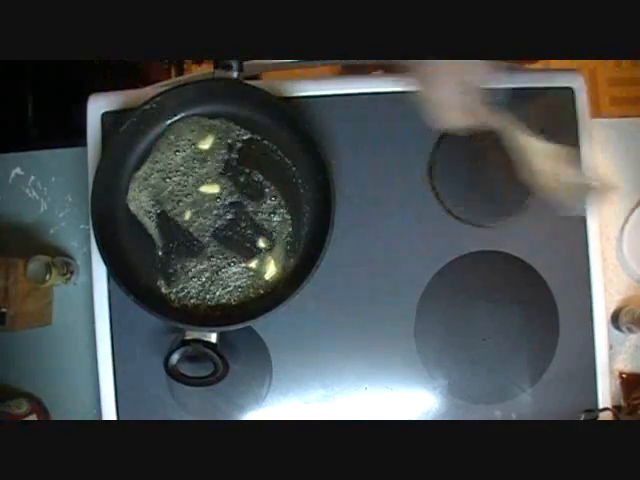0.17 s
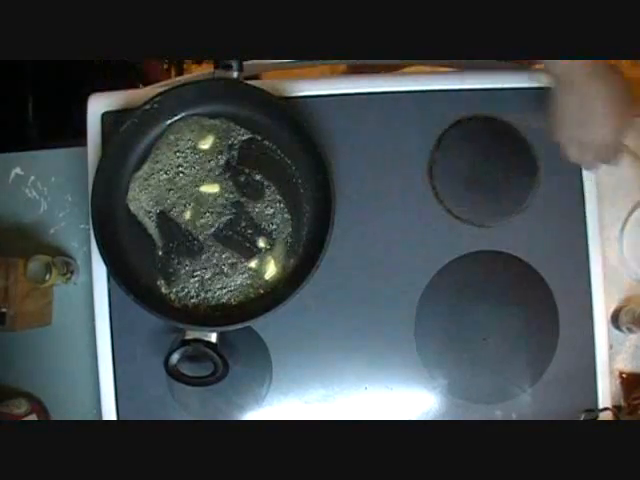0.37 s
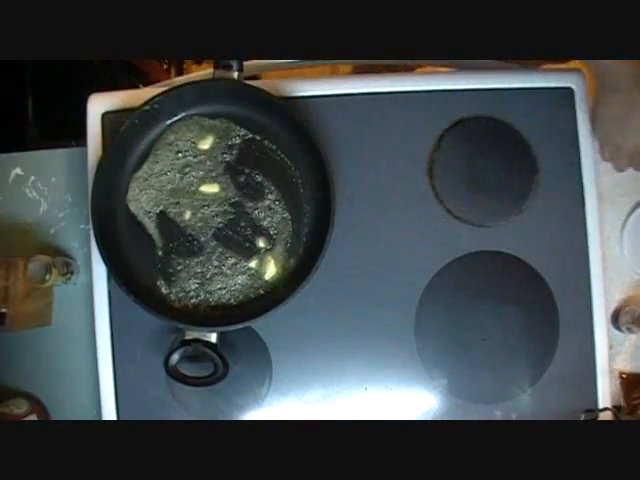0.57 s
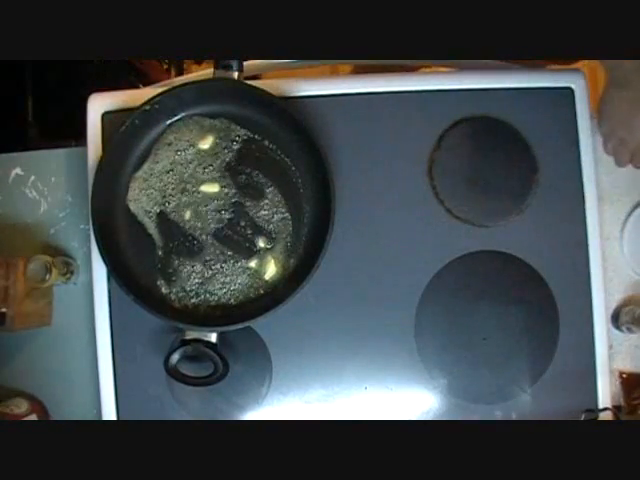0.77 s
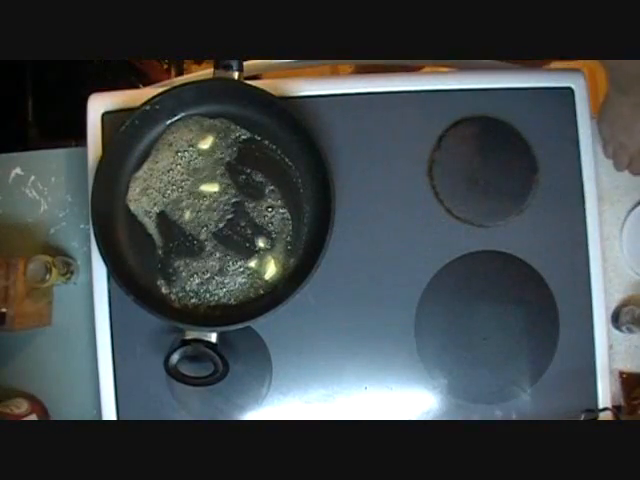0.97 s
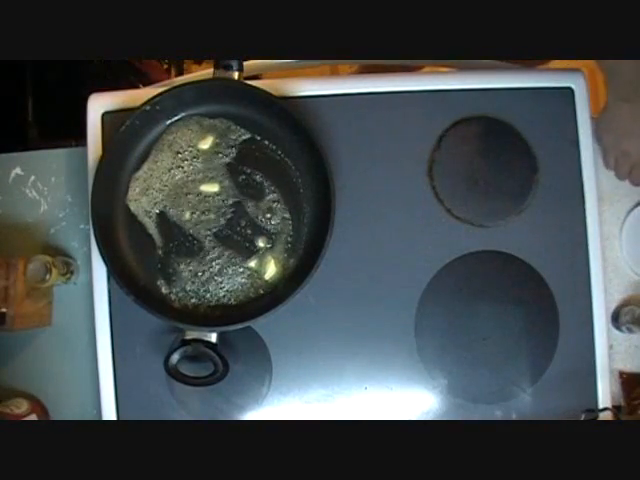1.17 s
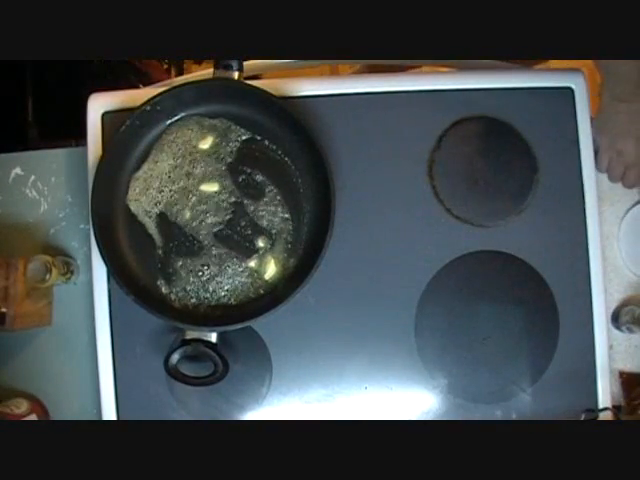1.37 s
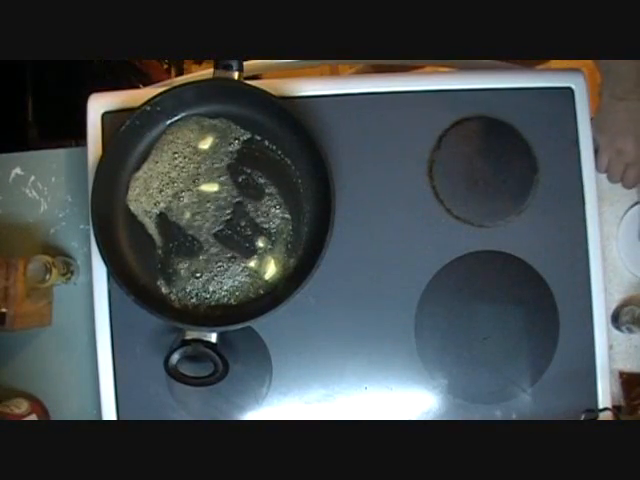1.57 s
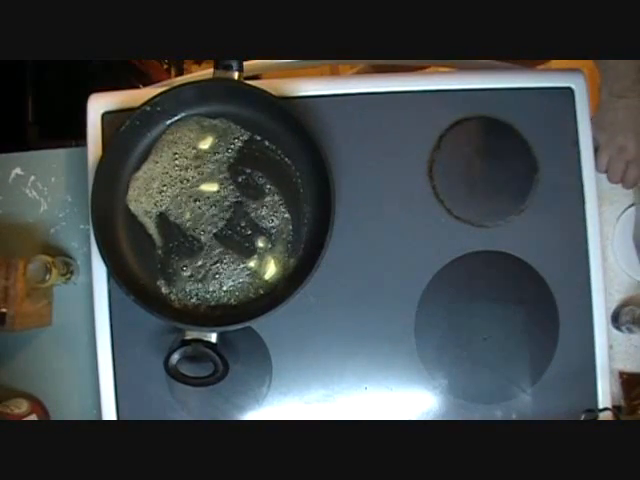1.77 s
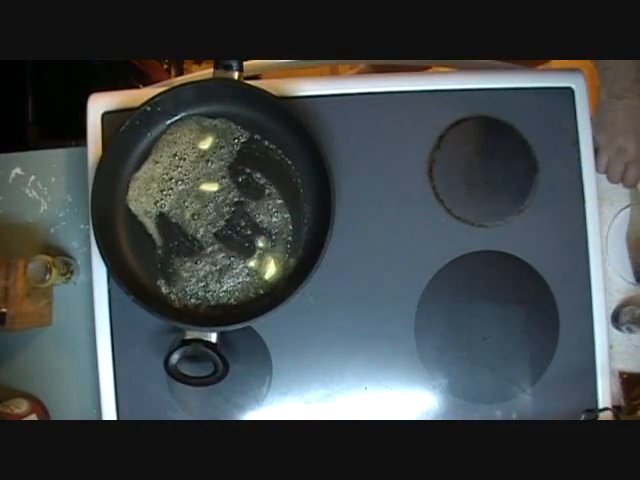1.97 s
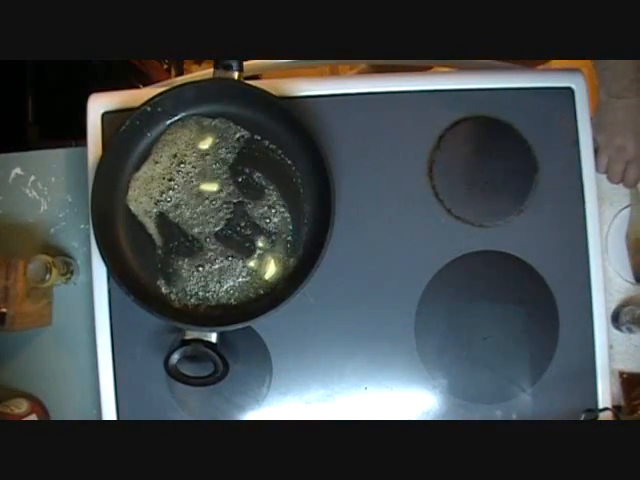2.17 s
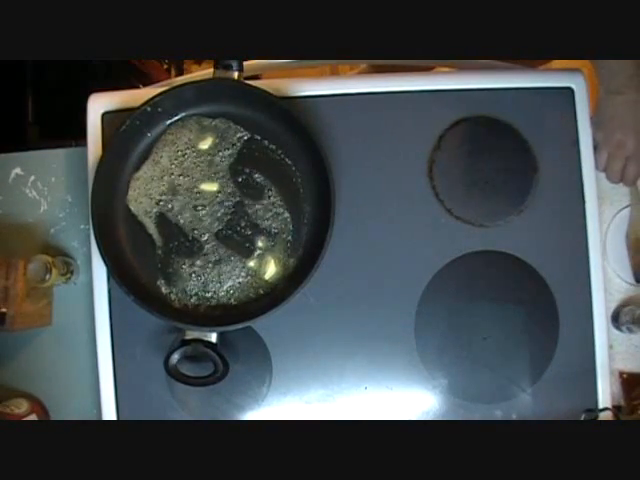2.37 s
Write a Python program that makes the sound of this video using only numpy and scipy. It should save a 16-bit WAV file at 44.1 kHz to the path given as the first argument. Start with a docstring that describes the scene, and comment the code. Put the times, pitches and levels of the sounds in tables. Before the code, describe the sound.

Butter sizzling steadily in a frying pan, with light knocks and ticks on the counter nearby

```python
"""Butter fries in a wide pan: thousands of tiny steam bubbles burst as short rings and melt into a bright
fizz, with louder spits of fat as single rings. Beside the stove someone lays a wooden spatula down and
handles things on the counter: dull knocks (struck modes), sharp ticks (short rings with noisy tails) and
a rustle (band-passed grains). One microphone, thin in the bass, in a small kitchen with low room tone
(wavering noise bands) and a faint hum (noise through a narrow resonance)."""
import sys
import numpy as np
from scipy import signal
from scipy.fft import rfft, irfft, next_fast_len
from scipy.io import wavfile
from scipy.ndimage import uniform_filter1d

SR = 44100
rng = np.random.default_rng(int(sys.argv[2]) if len(sys.argv) > 2 else 0)


def wav_record(signal):
    """Record a signal, one row per channel, as 16-bit PCM in the file named by sys.argv[1]."""
    frames = np.transpose(np.atleast_2d(signal))
    bounded = np.clip(frames, -1, 1)
    # unit amplitude maps onto the largest positive 16-bit level
    quanta = np.round(bounded * 32767).astype(np.int16)
    wavfile.write(sys.argv[1], SR, quanta)


N = 106633  # length of the scene [samples]


def from_db(db):
    """Gain of a dB value."""
    return 10 ** (np.asarray(db) / 20)


def rms_one(x):
    """Scale to rms 1."""
    return x / np.sqrt(np.mean(x ** 2) + 1e-20)


def in_time(rows):
    """A (time [s], value) curve at every sample."""
    return np.interp(np.arange(N) / SR, *np.transpose(rows))


def at_hz(points, hz):
    """A (frequency [Hz], level [dB]) spectrum read on a log frequency axis."""
    point_hz, point_db = np.transpose(points)
    return np.interp(np.log(hz), np.log(point_hz), point_db)


def drift(rate_hz):
    """Slow random wandering of rms 1: noise through two equal low-pass poles at rate_hz."""
    step = 20  # samples between the points of the curve
    warm_up = 2000  # points dropped while the filter settles
    pole = np.exp(-2 * np.pi * rate_hz * step / SR)
    white = rng.standard_normal(N // step + 2 + warm_up)
    slow = signal.lfilter([1], [1, -2 * pole, pole * pole], white)[warm_up:]
    return np.interp(np.arange(N) / step, np.arange(len(slow)), rms_one(slow))


def ring(clicks, hz, t60):
    """Two-pole resonance: a unit click starts a sine of height 1 that falls 60 dB in t60 seconds."""
    radius = from_db(-60 / (t60 * SR))
    angle = 2 * np.pi * hz / SR
    return signal.lfilter([0, np.sin(angle)], [1, -2 * radius * np.cos(angle), radius ** 2], clicks + 1e-18)


def pip(hz, cycles, size):
    """A click through the same resonance twice: a soft-edged short ring of peak 1."""
    click = 1. * (np.arange(size) == 0)
    once = ring(click, hz, cycles / hz)
    twice = ring(once, hz, cycles / hz)
    return twice / np.abs(twice).max()


def grains(per_s, spread_db, size):
    """Random clicks of either sign; their dB heights above 1 are spread almost exponentially."""
    chance, height, side = rng.random((3, size))
    happens = chance < per_s / SR
    return happens * from_db(-spread_db * np.log(1 - .995 * height)) * np.sign(side - .5)


def shape(x, spectrum):
    """Even out the long-term colour of a sound and lay the given one on it; rms 1."""
    size = next_fast_len(N)
    bins = rfft(x, size)
    hz = np.linspace(1, SR / 2, len(bins))
    own = np.sqrt(uniform_filter1d(np.abs(bins) ** 2, size=1500))
    edge = hz > spectrum[0][0] / 2  # nothing an octave or more below the first point
    return rms_one(irfft(bins / own * from_db(at_hz(spectrum, hz)) * edge, size)[:N])


def place(s, sound):
    """A sound set at s seconds on a silent track."""
    track = np.zeros(N + len(sound))
    start = int(s * SR)
    track[start:start + len(sound)] = sound[:len(track) - start]
    return track[:N]


def fizz():
    """Bubbles burst in swarms, each ringing a few cycles at a random pitch, over a smooth wavering hiss."""
    # level of the fizz as heard, with a brief dip just after the knock at 2.317 s: (time [s], level [dB])
    fizz_level = [(0, -28.5), (.28, -29), (.31, -28.5), (.45, -29), (.6, -28.5), (.7, -29), (.8, -29),
                  (.9, -29.5), (1.0, -28.5), (1.3, -29), (1.45, -29), (1.7, -29), (1.95, -28.5),
                  (1.975, -28.5), (2.0, -27.5), (2.06, -29), (2.25, -28.5), (2.315, -30), (2.35, -34.5),
                  (2.37, -31), (2.42, -33)]
    # colour of the fizz: (frequency [Hz], relative density [dB per Hz])
    fizz_colour = [(880, -70), (1500, -28), (1650, -18.5), (1770, -44), (1900, -21.5), (2480, -16.5),
                   (2760, -14.5), (3550, -10.5), (3910, -6.5), (5630, -1.5), (6090, -2), (6640, 0.5),
                   (8700, -2.5), (12000, -15), (15600, -34), (22000, -120)]
    bursts_per_s, size_spread_db, burst_cycles = 22000, 3.5, 6.6  # cycles until 60 dB down
    swarm_db, patch_db = 0.72, 1.95  # wander of the burst rate (each drift) and of each pitch's level
    hiss_share, hiss_waver_db = 0.53, 0.76  # share of the power, 0-1

    swarms = from_db(swarm_db * (drift(9.4) + drift(60)))
    clicks = grains(bursts_per_s * swarms, size_spread_db, N)
    pitches = np.geomspace(1500, 13000, 24)
    dealt = rng.integers(0, len(pitches), N)  # the pitch each click gets
    bubbles = 0
    for k, hz in enumerate(pitches):
        rings = rms_one(ring(clicks * (dealt == k), hz, burst_cycles / hz))
        bubbles = bubbles + from_db(patch_db * drift(6.7)) * rings * np.sqrt(hz)
    bubbles = shape(bubbles, fizz_colour)
    hiss = shape(rng.standard_normal(N) * from_db(hiss_waver_db * drift(24)), fizz_colour)
    mix = np.sqrt(1 - hiss_share) * bubbles + np.sqrt(hiss_share) * hiss
    return from_db(in_time(fizz_level)) * mix


def room_tone():
    """Low noise in third-octave bands that waver each on its own."""
    # colour of the quiet kitchen: (frequency [Hz], relative density [dB per Hz])
    tone_colour = [(88, -79), (150, -98), (211, -54), (283, -19), (389, -11), (529, -6), (1180, -5),
                   (1470, -7.5), (1600, -2), (2500, -9), (3250, -32), (5500, -120)]
    tone_db, patch_db, swell_db = -52.5, 1.5, 0.5  # level, wander of each band, wander of the whole
    edges = 230 * 2 ** np.arange(0, 3.6, 1 / 3)  # Hz
    white = rng.standard_normal((2, N))  # neighbouring bands take different noise
    tone = 0
    for k, (low, high) in enumerate(zip(edges, edges[1:])):
        band_pass = signal.butter(2, [low, high], "band", fs=SR, output="sos")
        band = signal.sosfilt(band_pass, white[k % 2])
        band_db = at_hz(tone_colour, np.sqrt(low * high)) + patch_db * drift(2)
        tone = tone + band * from_db(band_db)
    return from_db(tone_db + swell_db * drift(7.4)) * rms_one(tone)


def hum():
    """Noise through one narrow low resonance."""
    # the faint hum: (frequency [Hz], width [Hz], rms level [dB])
    hum_line = (291, 6.6, -70.5)
    hz, width_hz, db = hum_line
    t60 = np.log(1000) / np.pi / width_hz
    return from_db(db) * rms_one(ring(rng.standard_normal(N), hz, t60))


def spits():
    """A larger drop of fat bursts: one short bright ring."""
    # the loudest spits from the pan: (time [s], peak [dB], pitch [Hz])
    spit_rows = [(0.0782, -19, 8200), (0.286, -22, 6260), (1.05, -15, 8140), (1.077, -23, 5750),
                 (1.1915, -16.5, 7000), (1.3047, -15.5, 6130), (1.4596, -18, 7900), (1.68, -15, 7460),
                 (1.7165, -18, 7750), (1.9816, -16, 6900), (1.9883, -33, 5650), (2.0218, -16.5, 6940),
                 (2.235, -16.5, 6450), (2.3169, -14.5, 7650)]
    spit_cycles = 11.8  # sets the decay of each of the two resonances
    return sum(place(s, from_db(db) * pip(hz, spit_cycles, size=800)) for s, db, hz in spit_rows)


def knocks():
    """A blow and a dying rattle of contacts and echoes strike the counter's modes around the knock's centre."""
    # dull knocks on the counter:
    # (time [s], level before the mode offset [dB], centre [Hz], spread [octaves], rattle t60 [s])
    knock_rows = [(0.323, -42, 800, 0.43, 0.45), (0.351, -45, 1300, 0.44, 0.16),
                  (0.378, -45, 1280, 0.68, 0.21), (0.780, -42, 1650, 0.13, 0.18),
                  (0.795, -42, 870, 0.41, 0.25), (0.847, -41, 820, 0.14, 0.16),
                  (0.990, -42.5, 505, 1.1, 0.3), (1.000, -37, 517, 1, 0.21),
                  (1.006, -31.5, 1640, 0.16, 0.12), (1.416, -45.5, 1230, 0.79, 0.31),
                  (1.447, -37.5, 1140, 0.69, 0.081), (1.758, -40, 620, 0.93, .06),
                  (1.846, -40.5, 1120, 1, 0.067), (1.980, -34, 1700, 0.88, 0.35),
                  (2.030, -43.5, 990, 0.65, 0.18), (2.117, -43, 347, 0.54, 0.18),
                  (2.153, -38, 1530, 1.1, 0.088), (2.173, -21, 770, 0.23, 0.04),
                  (2.186, -46, 560, .7, 0.28), (2.303, -42.5, 400, 1, 0.19), (2.317, -36.5, 870, 1.2, .25),
                  (2.362, -31, 895, 1.14, .2), (2.365, -19, 1166, 0.11, 0.13),
                  (2.379, -34, 1100, 1.6, 0.11), (2.394, -34, 930, 1.1, 0.14), (2.396, -27, 1200, .12, .15)]
    # modes the counter rings with: (frequency [Hz], relative level [dB], t60 [s])
    counter_modes = [(197, -18, 0.11), (305, 6, 0.027), (472, -2.5, 0.17), (540, 0, 0.068),
                     (651, 2.5, 0.038), (714, -4.5, 0.045), (770, -1, 0.047), (813.4, -5.5, .12),
                     (980, 0, 0.034), (1080, 1, 0.023), (1187, 0, 0.051), (1350, -2, 0.03), (1571, 2, 0.05),
                     (1660, -9.5, 0.032), (1745, 5, 0.034), (1910, 7, 0.036), (2300, -17, 0.019)]
    rattle_per_s, rattle_spread_db, rattle_rise_s = 2000, 2.77, 0.0022
    first_blow_db, mode_offset_db = 8, -18.5
    t = np.arange(SR // 3) / SR
    out = 0
    for s, db, centre_hz, octaves, rattle_t60 in knock_rows:
        dying = from_db(-60 * t / rattle_t60)
        sound = 0
        for mode_hz, mode_db, mode_t60 in counter_modes:
            drive = grains(rattle_per_s, rattle_spread_db, len(t)) * np.minimum(t / rattle_rise_s, 1)
            drive[0] = from_db(first_blow_db) * rng.choice([-1, 1])
            # a mode one spread away from the centre is 6 dB weaker
            off_centre = np.log2(mode_hz / centre_hz) / octaves
            weight = from_db(mode_db - 6 * off_centre ** 2)
            sound = sound + weight * ring(drive * dying, mode_hz, mode_t60)
        out = out + place(s, from_db(db + mode_offset_db) * sound)
    return out


def ticks():
    """A hard contact: a short ring, then a noisy tail of the same pitch from the room."""
    # sharp ticks, ahead of the low cut: (time [s], ring peak [dB], pitch [Hz], tail re ring peak [dB])
    tick_rows = [(0.349, -26.5, 3620, -16), (0.597, -25.5, 4100, -12.5), (1.464, -26.5, 3930, -20),
                 (1.603, -22, 4400, -19), (1.997, -22.5, 4500, -9), (1.157, -31, 2720, -8),
                 (1.532, -35, 1790, -12), (1.563, -24, 3200, -12), (1.567, -32, 1580, -21),
                 (1.627, -30, 1920, -17), (1.753, -30, 2320, -16), (1.757, -22, 4000, -8.5),
                 (1.81, -27, 2670, -19), (1.876, -14.5, 3080, -16), (1.981, -25, 1880, -26),
                 (1.989, -16.5, 3030, -14), (2.011, -21.5, 2400, -12), (2.016, -20.5, 4200, -9.5),
                 (2.048, -23, 3920, -22), (2.097, -15, 3090, -15), (2.318, -32, 2800, -10)]
    tick_cycles, tail_cycles = 7, 3  # set the decay of the resonances
    tail_t60_s, tail_rise_s, low_cut_hz = .12, .003, 800
    t = np.arange(SR // 5) / SR
    out = 0
    for s, db, hz, tail_db in tick_rows:
        once = ring(rng.standard_normal(len(t)), hz, tail_cycles / hz)
        noise = rms_one(ring(once, hz, tail_cycles / hz))
        tail = from_db(tail_db - 60 * t / tail_t60_s) * noise * np.minimum(t / tail_rise_s, 1)
        out = out + place(s, from_db(db) * (pip(hz, tick_cycles, size=len(t)) + tail))
    return signal.sosfilt(signal.butter(2, low_cut_hz, "high", fs=SR, output="sos"), out)


def rustle():
    """Soft uneven grains in the middle range, thickening and thinning at random."""
    # handling on the counter: (time [s], level [dB])
    rustle_level = [(1.35, -63), (1.45, -48), (1.6, -52), (1.72, -51.5), (1.85, -40.5), (1.95, -41),
                    (2.03, -46), (2.12, -42.5), (2.22, -45), (2.29, -56), (2.42, -49)]
    low_hz, high_hz, grains_per_s, crowding_db = 755, 3200, 2800, 3.4
    band = signal.butter(2, [low_hz, high_hz], "band", fs=SR, output="sos")
    clicks = grains(grains_per_s * from_db(crowding_db * drift(20)), 1.0, N)
    return from_db(in_time(rustle_level)) * rms_one(signal.sosfilt(band, clicks))


def scene():
    """All sources at one microphone, the same on both channels."""
    mono = fizz() + room_tone() + hum() + spits() + knocks() + ticks() + rustle()
    return np.array([mono, mono])


def record(dry):
    """Band limits of the whole sound: steep filters remove the bass below 184 Hz and the top above 11950 Hz."""
    low_cut_hz, top_cut_hz = 184, 11950
    thin = signal.sosfilt(signal.butter(8, low_cut_hz, "high", fs=SR, output="sos"), dry)
    # 0.3 dB ripple in the pass band, 80 dB down above the cut
    return signal.sosfilt(signal.ellip(14, .3, 80, top_cut_hz, fs=SR, output="sos"), thin)


dry = scene()
out = record(dry)
wav_record(out)
```